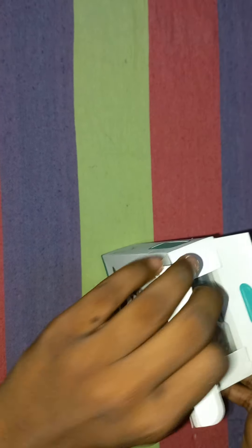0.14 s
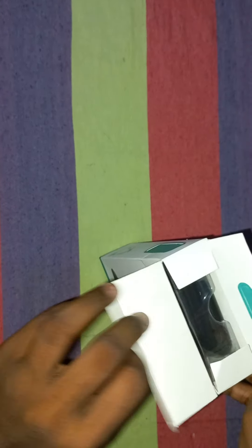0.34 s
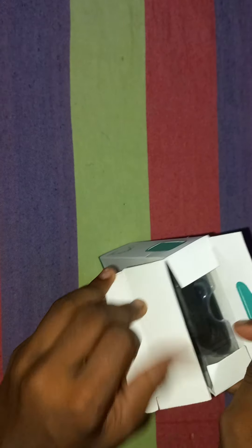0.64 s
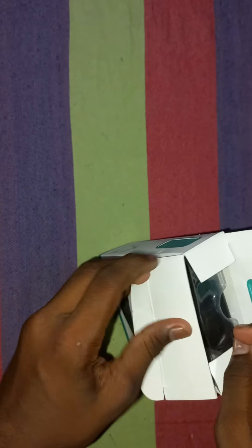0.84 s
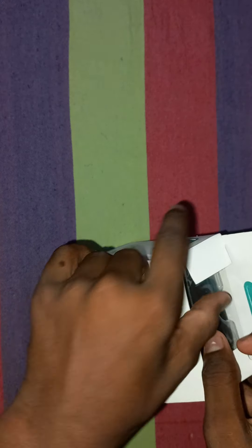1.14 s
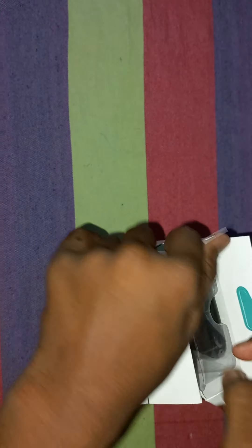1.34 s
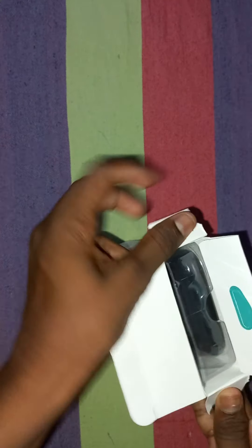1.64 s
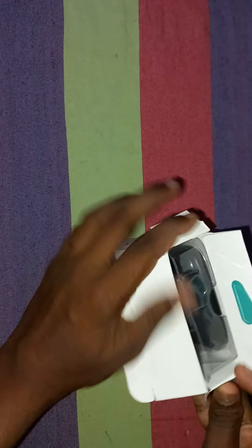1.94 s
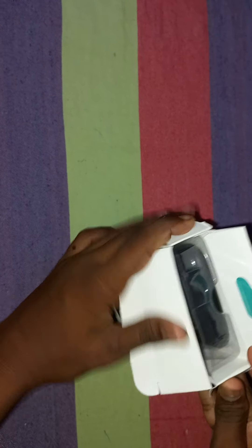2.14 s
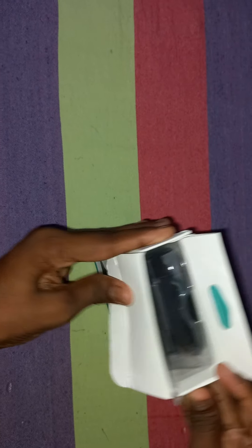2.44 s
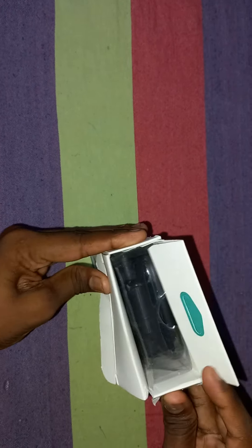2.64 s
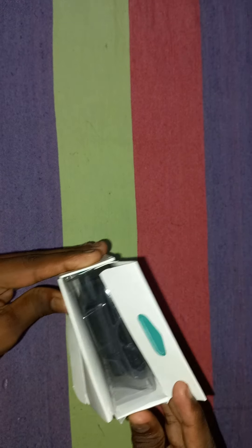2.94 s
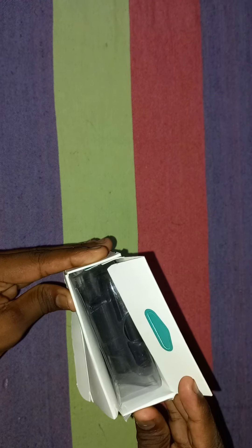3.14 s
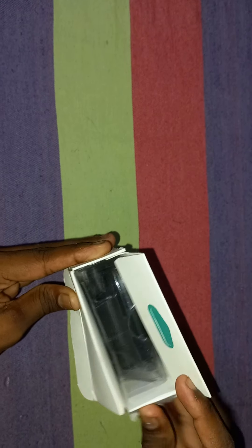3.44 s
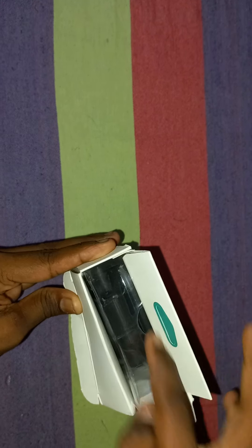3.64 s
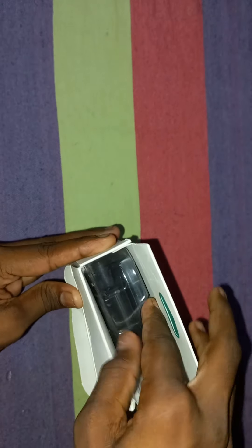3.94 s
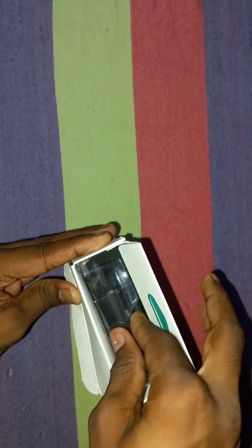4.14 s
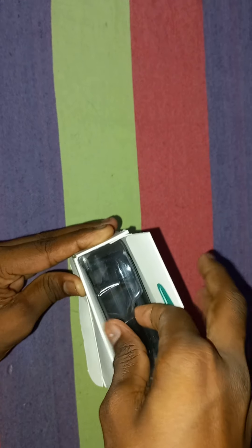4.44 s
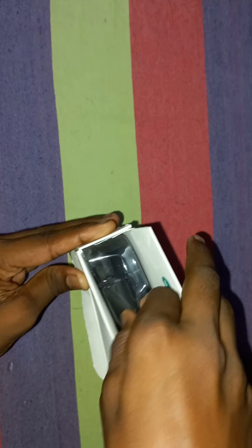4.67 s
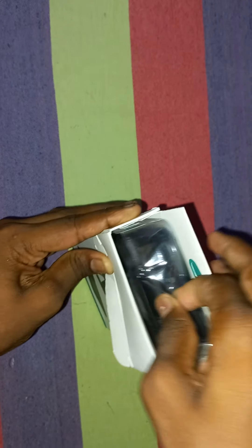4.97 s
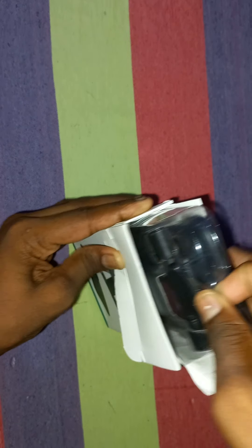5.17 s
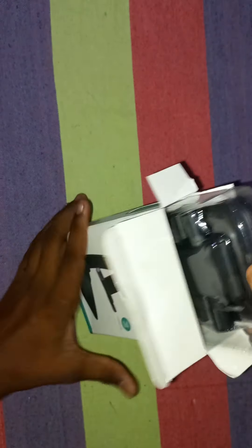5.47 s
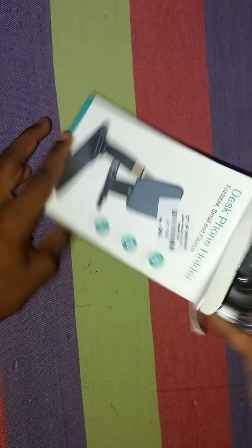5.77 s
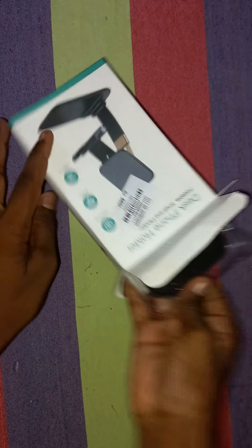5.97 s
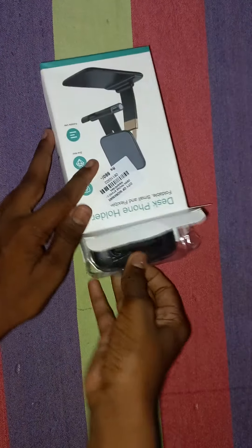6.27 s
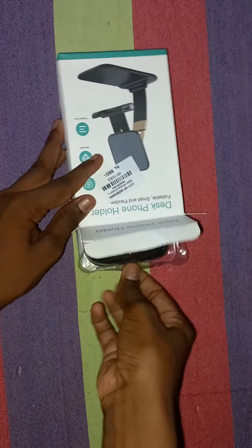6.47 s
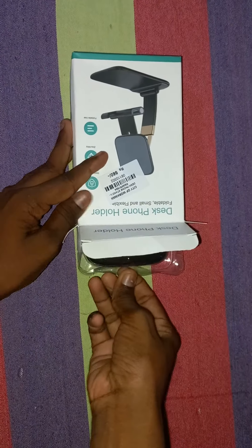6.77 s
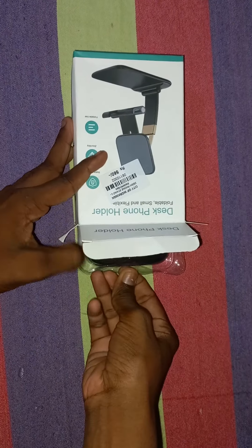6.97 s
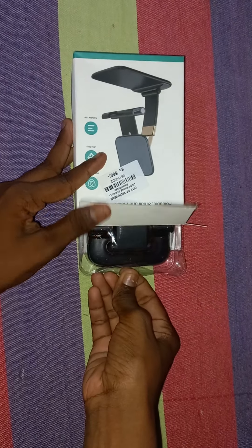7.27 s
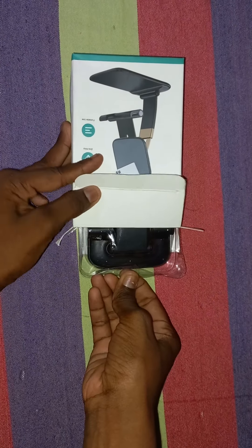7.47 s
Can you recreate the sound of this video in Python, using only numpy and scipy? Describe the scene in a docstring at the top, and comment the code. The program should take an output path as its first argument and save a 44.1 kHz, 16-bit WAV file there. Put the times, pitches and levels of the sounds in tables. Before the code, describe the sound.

Close, left-leaning handling of a small cardboard box in a small room, with a short diffuse echo. A loud cluster of crisp snaps, hollow knocking and a brief scrape starts immediately, fading by 0.3 s into light ticks and soft card rubbing. Around 1.65 s a tight volley of sharp cracks comes with a low thud; scrapes follow near 2.1 s and a snap at 2.5. It is mostly quiet from 2.6 to 4 s. From 4.05 to 5.5 s thin plastic buckles in bright, irregular crackles, strongest near 4.6, 4.75, 5.15 and 5.5, amid grainy, hissing rubs. Soft padded bumps fall at 6.05 and 6.45 s, with a snap at 6.3 and a short scrape at 6.8; a faint bump comes at 7.45. A soft fan rush continues throughout, while a distant engine's low hum wavers and rises until almost 5 s.

```python
"""Opening a small cardboard box

Hands open a small box on a cloth and pull out a thin plastic tray, close to the left of the microphone.
Flaps and tray buckle in sharp snaps: bursts of noise that make sets of resonances ring.
Card rubs on card and plastic in grainy, hissing noise; the box is set down with soft thuds of swelling tones.
A fan rushes softly in the small room as coloured noise, and the handling echoes and dies away there.
Outside, a distant engine slowly gathers speed: two rising harmonics that come and go."""
import sys
import numpy as np
from scipy import signal
from scipy.fft import rfft, irfft, next_fast_len
from scipy.io import wavfile

SR = 44100
rng = np.random.default_rng(int(sys.argv[2]) if len(sys.argv) > 2 else 0)


def to_wav(sig):
    """Store sig (one row per channel, or 1-D mono) as 16-bit WAV at the path in sys.argv[1].

    Samples outside -1..1 are clipped; the rate is SR.
    """
    pcm = np.clip(np.atleast_2d(sig), -1, 1) * 32767
    pcm = np.round(pcm).astype(np.int16)
    wavfile.write(sys.argv[1], SR, pcm.T)  # frames by channels


N = 335601
TIME = np.arange(N) / SR
CUTOFF_HZ = 16200  # top of the room's wash and of the microphone

# one surface sliding over another: (middle [s], length [s], scrape level [dB], hiss level [dB])
STROKES = [(0.037, 0.065, -39.5, -51), (0.187, 0.089, -52.5, -60), (0.48, 0.18, -63, -71),
           (0.764, 0.12, -59.5, -62), (1.002, 0.046, -54, -56), (1.32, 0.047, -59, -62),
           (1.592, 0.16, -58.5, -67), (1.991, 0.23, -57, -58.5), (2.071, 0.035, -41.5, -49),
           (2.236, 0.23, -56, -57.5), (2.543, 0.1, -54, -64), (2.781, 0.13, -55, -55.5),
           (3.529, 0.2, -65, -68.5), (3.872, 0.2, -61, -66), (4.067, 0.043, -43, -51.5),
           (4.606, 0.31, -58.5, -66), (4.925, 0.088, -47.5, -54.5), (5.095, 0.31, -51.5, -54.5),
           (5.396, 0.025, -48, -51), (5.468, 0.083, -53, -63.5), (5.881, 0.087, -59.5, -64),
           (6.177, 0.22, -55, -64.5), (6.462, 0.12, -53, -62), (6.826, 0.065, -45.5, -54)]


def from_db(db):
    """Turn decibels into a gain."""
    return 10 ** (np.asarray(db) / 20)


def rms_one(x):
    """Scale a signal to an rms of 1."""
    return x / np.sqrt(np.mean(x ** 2) + 1e-20)


def in_time(rows):
    """Read the value columns of a time curve at every sample."""
    s, *columns = np.transpose(rows)
    return [np.interp(TIME, s, column) for column in columns]


def at_hz(points, hz):
    """Read a spectrum between its points, on a logarithmic frequency axis."""
    f, value = np.transpose(points)
    return np.interp(np.log(hz + 1), np.log(f), value)


def coloured(x, spectrum):
    """Filter a signal by a spectrum in dB, then scale it to an rms of 1."""
    size = next_fast_len(N)
    hz = np.arange(size // 2 + 1) * SR / size
    filtered = irfft(rfft(x, size) * from_db(at_hz(spectrum, hz)), size)
    return rms_one(filtered[..., :N])


def drift(rate):
    """Slow random wandering with rate new values a second and an rms of 1."""
    knots = rng.standard_normal(N // 20)
    return rms_one(np.interp(TIME * rate, np.arange(len(knots)), knots))


def resonate(x, modes):
    """Add up parallel resonances (Hz, width in Hz, dB) with alternating signs."""
    out = 0
    for k, (hz, width, db) in enumerate(modes):
        r = np.exp(-np.pi * width / SR)
        zeros = [(1 - r * r) / 2, 0, (r * r - 1) / 2]
        poles = [1, -2 * r * np.cos(2 * np.pi * hz / SR), r * r]
        out = out + (-1) ** k * from_db(db) * signal.lfilter(zeros, poles, x)
    return out


def add(track, s, sound):
    """Mix a sound into a track at time s."""
    at = max(0, int(s * SR))
    track[:, at:at + sound.shape[-1]] += sound[:, :N - at]


def from_left(x, right_db, count=7):
    """Sound from the left reaches the right port at another level and count samples later."""
    return np.array([x[0], from_db(right_db) * np.roll(x[1], count)])


def air():
    """The fan's diffuse rush: noise that is most alike at both ports in the bass."""
    # colour of the rush: (frequency [Hz], relative level [dB per Hz])
    air_spectrum = [(25, -35.5), (40, -16.5), (60, -5.5), (85, -3.5), (125, -0.5), (170, -6), (260, -13.5),
                    (390, -9), (520, -12), (680, -18), (1100, -18), (1800, -20.5), (2900, -24), (4300, -38),
                    (6800, -35), (8600, -47.5), (16000, -51.5)]
    # how alike left and right are: (frequency [Hz], likeness [0 to 1])
    likeness = [(35, 0.68), (100, 1), (200, 0.89), (380, 0.9), (700, 0.42), (1300, 0), (2400, 0)]
    # loudness of the rush: (time [s], level [dB])
    air_db = [(0, -49), (2.5, -50), (3.5, -51.5), (4.5, -49), (5.8, -51), (6.8, -50), (7.1, -53.5),
              (7.6, -51.5)]
    size = next_fast_len(N)
    hz = np.arange(size // 2 + 1) * SR / size
    alike = np.clip(at_hz(likeness, hz), -1, 1)
    mid, side = rfft(rng.standard_normal((2, size)))
    both = np.sqrt(1 + alike) * mid + np.sqrt(1 - alike) * side * [[1], [-1]]
    left, right = irfft(both, size)[:, :N]
    # the right port faces the rush and gets more of its middle range
    right = right + resonate(right, [(1293, 1300, -6.5)])
    return from_db(in_time(air_db)[0]) * coloured(np.array([left, right]), air_spectrum)


def engine():
    """Only the lowest two harmonics of the exhaust come through the walls, rising as the engine speeds up."""
    # loudness of the first harmonic: (time [s], level [dB])
    engine_db = [(0, -45.5), (.2, -43), (.5, -48.5), (.85, -48.5), (1.2, -65.5), (1.5, -50.5), (2.0, -58.5),
                 (2.6, -55), (3.1, -52), (3.35, -57), (3.55, -77), (3.75, -50), (4.15, -48), (4.4, -55.5),
                 (4.68, -50.5), (4.9, -90)]
    idle_hz, rise_hz_per_s = 64.63, 5.2  # firing rate at the start, its rise
    second_db, second_waver_db = -56.5, 2.5
    wall_edge_hz, wall_loss_db_per_hz = 154.7, 1.4  # the walls weaken the second harmonic above the edge
    hz = idle_hz + rise_hz_per_s * TIME
    past_edge_hz = np.maximum(2 * hz - wall_edge_hz, 0)
    second_level_db = second_db - wall_loss_db_per_hz * past_edge_hz + second_waver_db * drift(5.02)
    unsteady_hz = hz * (1 + 0.011 * drift(12))
    phase = 2 * np.pi * np.cumsum(unsteady_hz) / SR
    first = from_db(in_time(engine_db)[0]) * np.sin(phase)
    second = from_db(second_level_db) * np.sin(2 * phase)
    # the square root of 2 makes the levels rms; both harmonics waver together
    return np.sqrt(2) * from_db(1.5 * drift(13)) * (first + second)


def friction(grains_per_s, grain_db, smooth):
    """Fibres catch and let go: clumps of uneven grains on a smooth rush."""
    crowding = from_db(5 * drift(70))
    born = rng.random(N) < grains_per_s * crowding / SR
    size_db = grain_db * np.minimum(rng.exponential(1, N), 4)
    grains = born * from_db(size_db) * rng.standard_normal((2, N))
    return rms_one(rms_one(grains) + smooth * rng.standard_normal((2, N)))


def rubbing():
    """Strokes speed up and slow down over a faint shifting grip; card scrapes in grains, smooth faces hiss."""
    # colour of card scraping: (frequency [Hz], relative level [dB per Hz])
    scrape_spectrum = [(400, -13.5), (1000, 5.5), (1600, 2.5), (2400, 1.5), (3200, 6), (4500, -7),
                       (6700, -1.5), (8200, -24), (10000, -21)]
    # colour of smooth faces hissing: (frequency [Hz], relative level [dB per Hz])
    hiss_spectrum = [(6000, -12.5), (8500, -20.5), (10500, 3), (12000, 5), (14000, 4.5), (16000, -5)]
    # the fingers keep shifting their grip: levels at the firmest, loss as it slackens
    grip_scrape_db, grip_hiss_db, grip_swing_db, shifts_per_s = -62.5, -75.5, 6, 9
    grip = from_db(-grip_swing_db * np.abs(drift(shifts_per_s) - 1))
    scrape_gain, hiss_gain = from_db(grip_scrape_db) * grip, from_db(grip_hiss_db) * grip
    for s, length, scrape_db, hiss_db in STROKES:
        speed = np.exp(-(2 * (TIME - s) / length) ** 2)
        # hypot adds the powers
        scrape_gain = np.hypot(scrape_gain, from_db(scrape_db) * speed)
        hiss_gain = np.hypot(hiss_gain, from_db(hiss_db) * speed)
    scrape = scrape_gain * coloured(friction(grains_per_s=2500, grain_db=2.5, smooth=0.73), scrape_spectrum)
    hiss = hiss_gain * coloured(friction(grains_per_s=1800, grain_db=4.0, smooth=1.0), hiss_spectrum)
    return from_left(scrape, right_db=-8.5) + from_left(hiss, right_db=-15.0)


def slips(t60, first, alike):
    """One sudden give and a dying volley of tiny slips, partly alike at the two microphone ports."""
    t = TIME[:SR // 8]
    dying = from_db(-60 * t / max(t60, .003))
    common, own = rng.standard_normal((2, len(t))) * dying
    common[8] += first
    return np.array([common, alike * common + np.sqrt(1 - alike ** 2) * own])


def struck(force, modes, db, scatter_db=3.0):
    """A blow rings modes with new strengths each time; db is its energy spread over 10 ms."""
    scatter = rng.normal(0, 1, (len(modes), 1)) * [0, 0, scatter_db]
    rung = resonate(force, np.array(modes) + scatter)
    power = np.sum(rung ** 2, axis=1, keepdims=True) / (.01 * SR)
    return from_db(db) * rung / np.sqrt(power)


def snap(panel_db, pitch_hz, crack_db, t60):
    """A buckling panel rings at a pitch set by its tension; creases and rims add the crack."""
    # ringing of a panel: (multiple of its pitch [ratio], width [Hz], relative level [dB])
    panel_modes = [(.70, 239.6, -4.5), (0.829, 220, 1.5), (1.003, 280, 6.5), (1.12, 277, 4),
                   (1.279, 320, -1.5), (1.449, 398, -8.5)]
    # flexing of a whole side: (frequency [Hz], width [Hz], relative level [dB])
    flex_modes = [(1610, 113, -2), (1962, 200, -1), (2150, 180, -4.5)]
    # ringing of the stiff creases: (frequency [Hz], width [Hz], relative level [dB])
    crease_modes = [(5040, 637, 3), (6030, 2360, 6.5), (7420, 520, 3)]
    # ringing of the rims: (frequency [Hz], width [Hz], relative level [dB])
    rim_modes = [(10300, 1800, -13), (12800, 1400, -3.5), (14580, 1700, -2), (14700, 1100, 3.5)]
    force = slips(t60, first=2.3, alike=0.42)
    panel = struck(force, np.array(panel_modes) * [pitch_hz, 1, 1], panel_db - .8)
    # below a threshold the side as a whole hardly moves, and its travel is limited
    flex_db = min(panel_db, -27) - 9 + 2 * min(panel_db + 24, 0)
    flex = struck(force, flex_modes, flex_db)
    crease = struck(force, crease_modes, 0.47 * panel_db + 0.38 * crack_db - 11.5)
    rim = struck(slips(0.89 * t60, first=1.9, alike=.7), rim_modes, crack_db - .3)
    # the rims are shaded most at the right port; the flexing is not shaded
    out = from_left(panel + crease, right_db=-11.5)
    return out + from_left(flex, right_db=0.5) + from_left(rim, right_db=-15.5)


def crinkle(below_db, count=12):
    """Edges catch at random in each stroke, up to count times, more loudly the harder the scrape."""
    catches_per_s = 45  # per second of stroke length
    out = np.zeros((2, N))
    for s, length, scrape_db, hiss_db in STROKES:
        for k, (when, size, pitch) in enumerate(rng.uniform(-1.2, 1, (count, 3))):
            db = below_db + 5 * size
            tick = snap(scrape_db + db, 3000 + 600 * pitch, hiss_db + db, 0.012)
            # short strokes keep only the first few catches
            add(out, s + when * length / 2, tick * (k < catches_per_s * length))
    return out


def snaps():
    """Flaps and tray buckle one after another, the harder the shorter."""
    # panels buckling: (time [s], panel level [dB], panel pitch [Hz], treble crack level [dB])
    snap_list = [(0.0253, -31, 2770, -36), (0.03, -32, 3230, -43), (0.0425, -23.5, 3210, -33.5),
                 (0.0443, -22.5, 3970, -42), (0.053, -46, 2540, -33.5), (0.147, -43, 3680, -47.5),
                 (0.2075, -46.5, 2790, -45), (0.343, -55.5, 2550, -55), (0.5442, -50.5, 3300, -74),
                 (0.7862, -44.5, 2890, -61), (1.0056, -41, 3040, -57), (1.3236, -55, 2800, -57),
                 (1.5589, -47, 2560, -59), (1.64, -38.5, 2600, -48), (1.6482, -32.5, 2880, -34.5),
                 (1.6512, -27, 2820, -42), (1.6656, -28.5, 2730, -37), (2.026, -43.5, 2860, -85),
                 (2.059, -56, 2800, -48), (2.0702, -41, 2820, -73), (2.4903, -35, 2780, -48.5),
                 (4.0546, -38.5, 2820, -53), (4.169, -39, 2660, -75), (4.282, -47, 2190, -75),
                 (4.4157, -35.5, 2870, -68), (4.563, -39, 2520, -61), (4.601, -25.5, 2890, -33),
                 (4.6564, -41.5, 2720, -56), (4.721, -52, 3140, -53), (4.744, -27.5, 2770, -27.5),
                 (4.8524, -30, 2780, -52), (4.921, -43.5, 2900, -47), (5.1388, -26.5, 3250, -29.5),
                 (5.233, -49, 2190, -55), (5.2964, -53, 2800, -56), (5.3338, -47, 2540, -63),
                 (5.3972, -35, 2340, -80), (5.5111, -29.5, 2940, -52), (5.5162, -32, 3370, -21.5),
                 (5.6945, -47, 2100, -49), (5.8393, -43.5, 2850, -57), (6.0524, -42, 2400, -57),
                 (6.2344, -48.5, 2890, -56), (6.3103, -30, 3360, -42), (6.4282, -50, 3000, -62),
                 (6.4503, -38.5, 2800, -54), (6.812, -41.5, 2920, -46)]
    # a gentle snap crumples for longer: t60 at a hard snap's level, dB less that double it
    ring_s, hard_snap_db, ring_doubles_db = 0.02, -27.5, 15
    out = np.zeros((2, N))
    for s, panel_db, pitch_hz, crack_db in snap_list:
        softer_db = hard_snap_db - max(panel_db, crack_db)
        t60 = ring_s * 2 ** (softer_db / ring_doubles_db)
        add(out, s, snap(panel_db, pitch_hz, crack_db, t60))
    return out


def knocks():
    """Knocks passed into the hollow box sound its walls and the air inside."""
    # knocks: (time [s], cavity level [dB])
    knock_list = [(0.0249, -41.5), (0.0445, -32.5), (1.647, -34), (1.668, -48), (2.49, -46.5),
                  (4.168, -47.5), (4.417, -53), (4.6, -48), (4.852, -55), (5.139, -46.5), (6.0465, -42),
                  (6.076, -46), (6.447, -60)]
    # modes of the box's hollow: (frequency [Hz], width [Hz], relative level [dB])
    cavity_modes = [(202, 46, -1.5), (349, 18, 1), (409, 65, 2), (537, 58, 1)]
    # modes of the walls: (frequency [Hz], width [Hz], relative level [dB])
    wall_modes = [(700, 72, -1.5), (894, 210, 0.5), (1340, 480, -2.5)]
    # the walls sound even at a light touch: level at a middling knock, share of its swing they follow
    wall_mid_db, mid_knock_db, wall_follows = -46, -44, 0.4
    out = np.zeros((2, N))
    for s, cavity_db in knock_list:
        force = slips(0.086, first=2.1, alike=0.97)
        wall_db = wall_mid_db + wall_follows * (cavity_db - mid_knock_db)
        cavity = struck(force, cavity_modes, cavity_db)
        add(out, s, cavity + struck(force, wall_modes, wall_db))
    # soft card passes little treble
    return signal.sosfilt(signal.butter(2, 1500, fs=SR, output="sos"), out + 1e-18)


def echo(x):
    """The nearest hard surface throws the treble back once, thin and weak."""
    delay_s, echo_db, low_hz = .0118, -17, 2425
    thin = signal.sosfilt(signal.butter(1, low_hz, "high", fs=SR, output="sos"), x)
    out = np.zeros((2, N))
    add(out, delay_s, from_db(echo_db) * thin)
    return out


def room(x, wet_db, treble_t60, gap_s, shade_db):
    """Energy piles up and dies away band by band, and comes back from all sides as a diffuse wash."""
    bass_t60 = 0.35  # s, approached toward the lowest bands
    out, t = np.zeros((2, N)), TIME[:SR // 2]
    edges = np.geomspace(250, CUTOFF_HZ, num=13)
    white = rng.standard_normal((2, 2, N))
    for k, band in enumerate(zip(edges, edges[1:])):
        sos = signal.butter(3, band, "band", fs=SR, output="sos")
        # the treble dies a little sooner and is shaded at the right port
        high = band[0] / edges[-2]
        t60 = bass_t60 + high * (treble_t60 - bass_t60)
        fade_in = np.clip(t / gap_s - .5, 0, 1)
        dying = from_db(-60 * t / t60) * fade_in
        power = signal.sosfilt(sos, x + 1e-18) ** 2
        energy = signal.fftconvolve(power, dying ** 2 / np.sum(dying ** 2))[:N]
        # neighbouring bands use different noise
        noise = rms_one(signal.sosfilt(sos, white[k % 2]))
        out += np.sqrt(np.abs(energy)) * noise * from_db([[0], [shade_db * high]])
    return from_db(wet_db) * out


def bumps():
    """The box bumps softly on the padded table: the tones of each thud swell and die within a few cycles."""
    # tones of the thuds, several to one thud:
    # (time [s], peak of the swell [dB], frequency [Hz], rise to the peak [s])
    thud_tones = [(1.637, -35, 124, 0.0067), (2.24, -40.5, 69.5, 0.041), (6.043, -42.5, 124, 0.034),
                  (6.048, -36.5, 340, 0.0053), (6.434, -31.5, 119, 0.023), (6.44, -45.5, 235, 0.021),
                  (6.445, -44, 62, 0.042), (6.525, -39.5, 122, 0.018), (7.44, -42.5, 102, 0.0061)]
    out, t = np.zeros((2, N)), TIME[:SR // 2]
    for s, db, hz, rise in thud_tones:
        swell = (t / rise * np.exp(1 - t / rise)) ** 2
        tone = np.sin(2 * np.pi * hz * t)
        add(out, s, from_db(db) * swell * tone * np.ones((2, 1)))
    return out


def scene():
    """The handling in its room, over the fan and the distant engine."""
    handling = snaps() + knocks() + rubbing() + crinkle(below_db=-7.0)
    wash = room(handling[0], wet_db=-15.0, treble_t60=0.28, gap_s=0.0018, shade_db=-5.0)
    return handling + echo(handling) + wash + bumps() + engine() + air()


def record(dry):
    """The microphone has a dip in the upper treble, and the top is cut steeply."""
    dipped = dry - resonate(dry, [(8700, 580, -10)])
    return signal.sosfilt(signal.ellip(10, .2, 70, CUTOFF_HZ, fs=SR, output="sos"), dipped)


dry = scene()
out = record(dry)
to_wav(out)
```